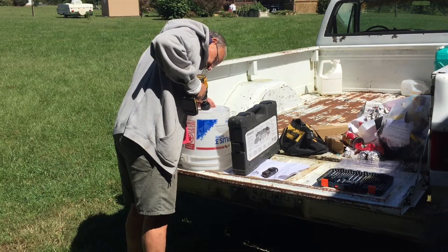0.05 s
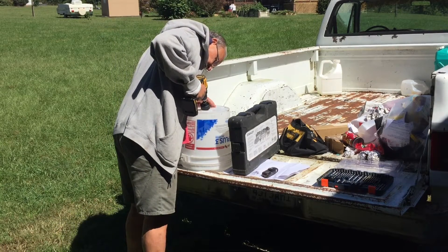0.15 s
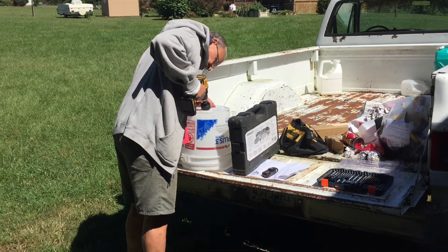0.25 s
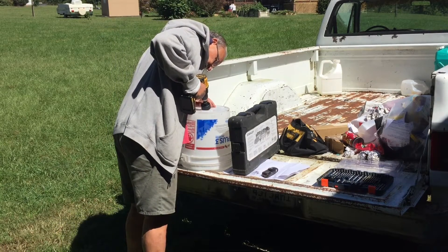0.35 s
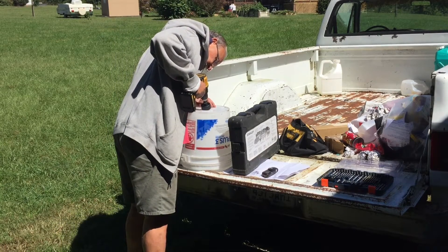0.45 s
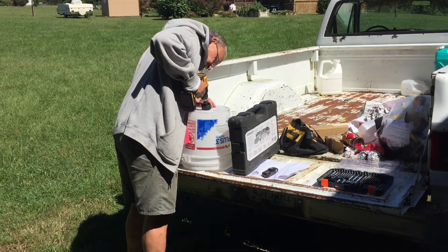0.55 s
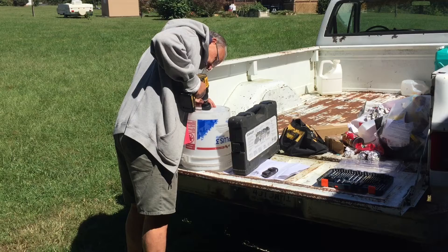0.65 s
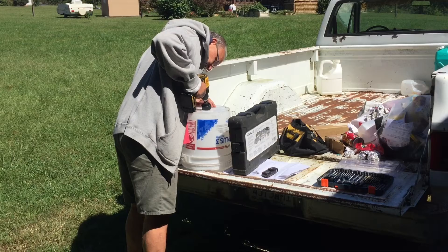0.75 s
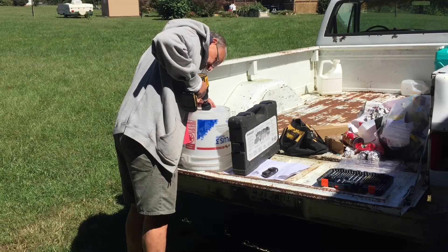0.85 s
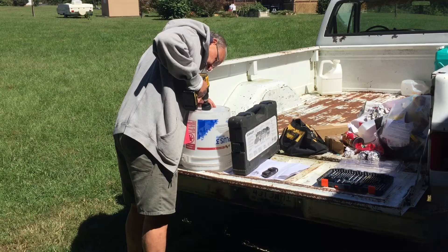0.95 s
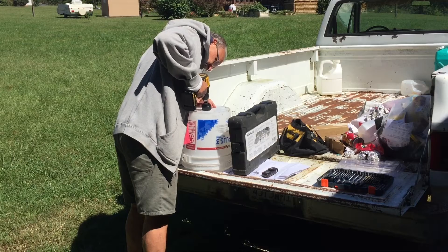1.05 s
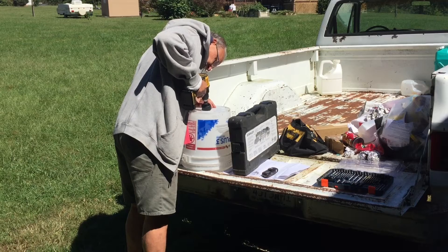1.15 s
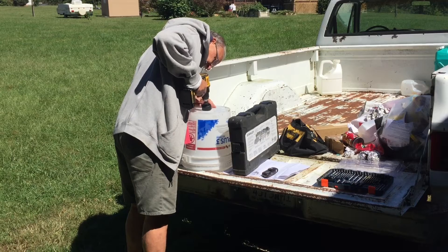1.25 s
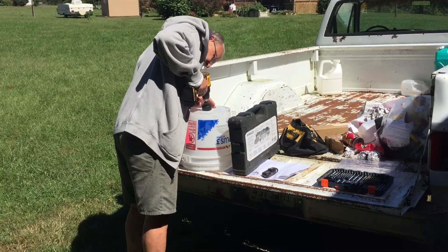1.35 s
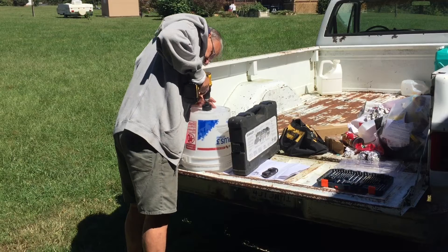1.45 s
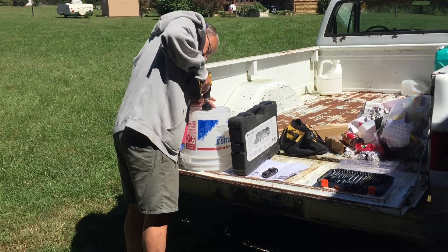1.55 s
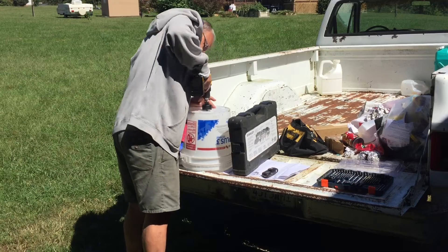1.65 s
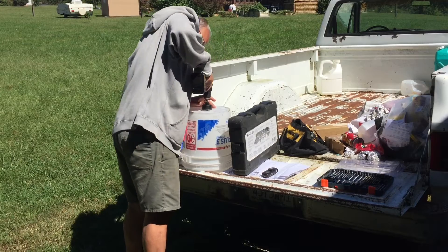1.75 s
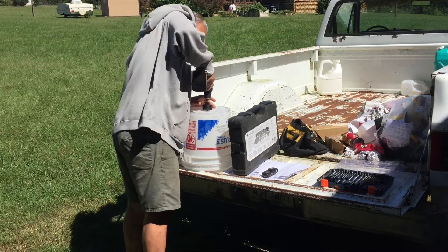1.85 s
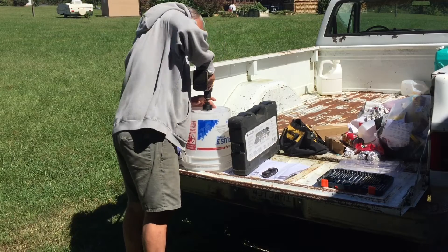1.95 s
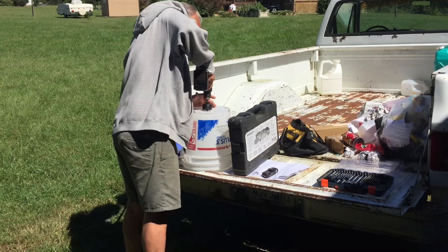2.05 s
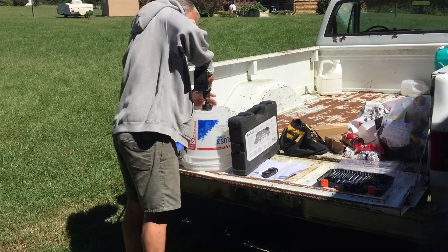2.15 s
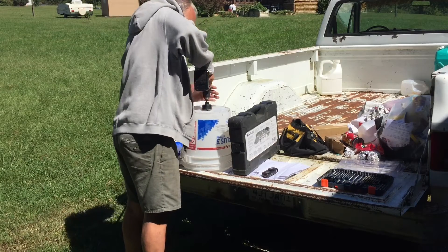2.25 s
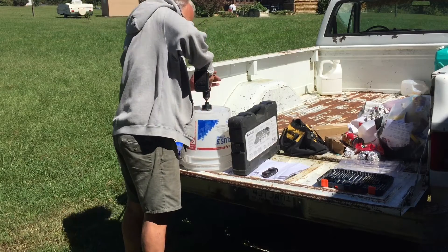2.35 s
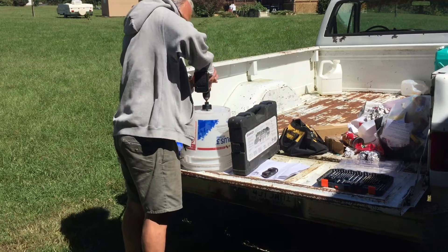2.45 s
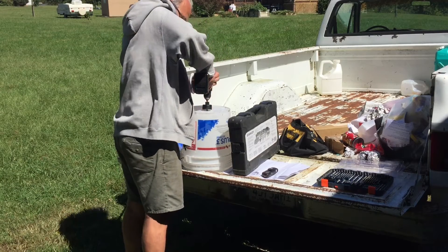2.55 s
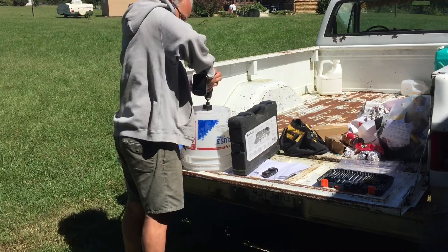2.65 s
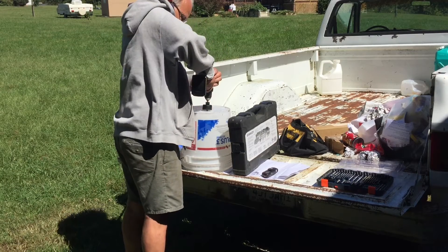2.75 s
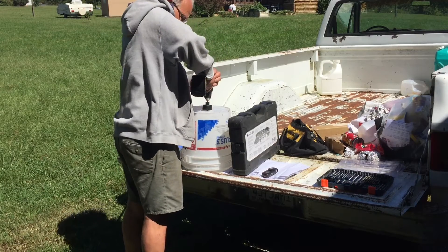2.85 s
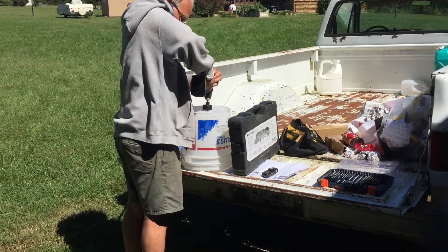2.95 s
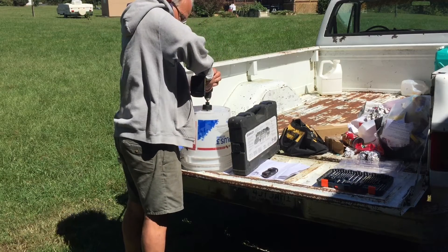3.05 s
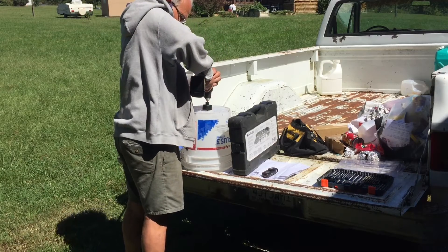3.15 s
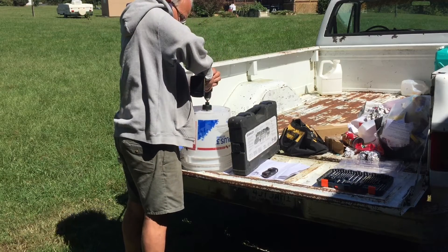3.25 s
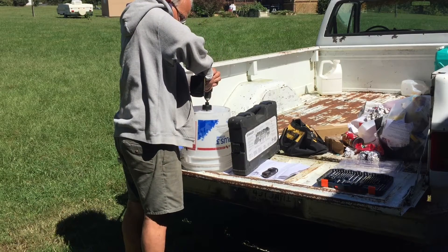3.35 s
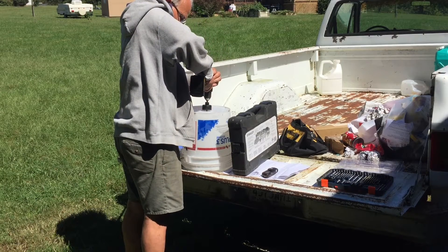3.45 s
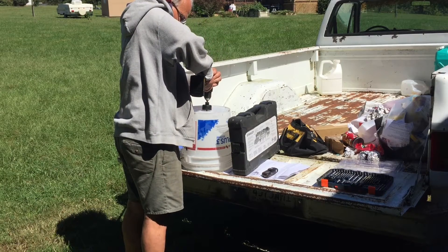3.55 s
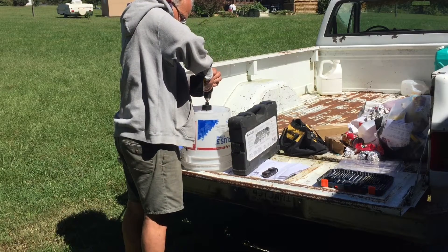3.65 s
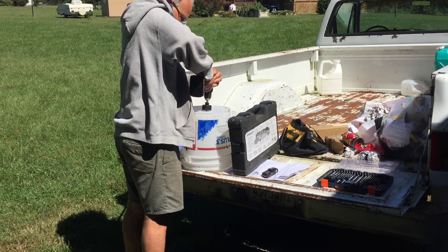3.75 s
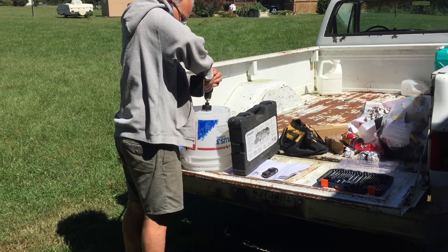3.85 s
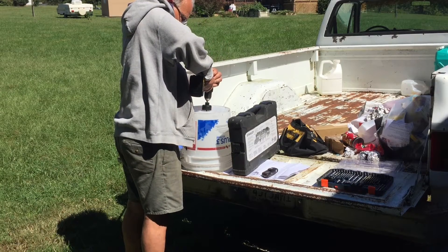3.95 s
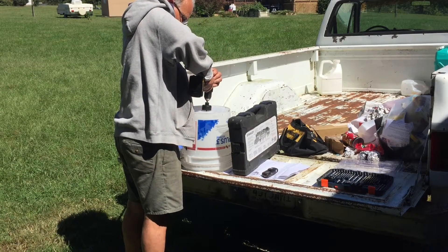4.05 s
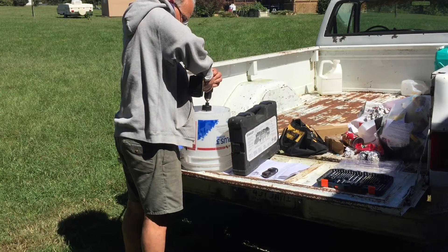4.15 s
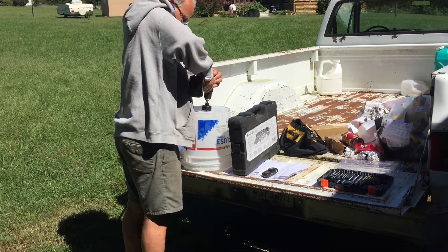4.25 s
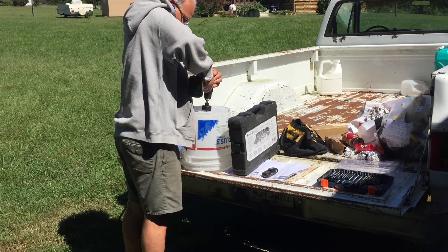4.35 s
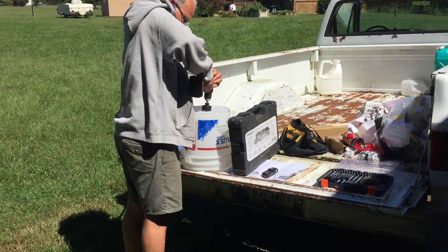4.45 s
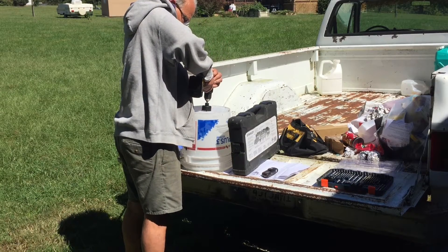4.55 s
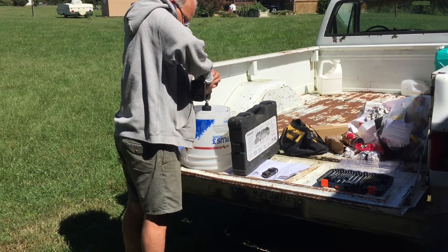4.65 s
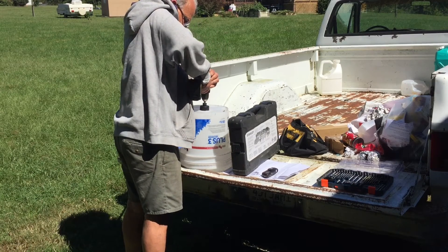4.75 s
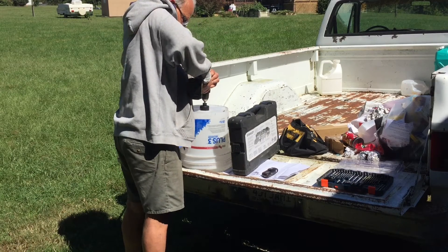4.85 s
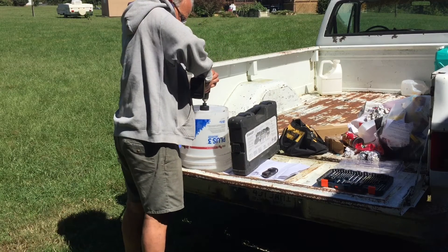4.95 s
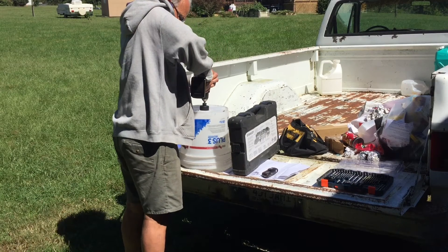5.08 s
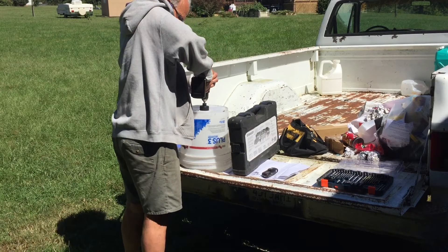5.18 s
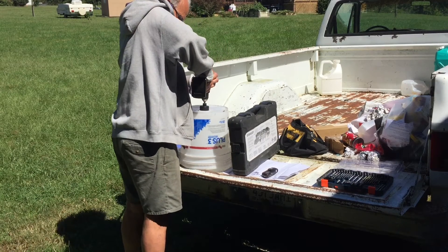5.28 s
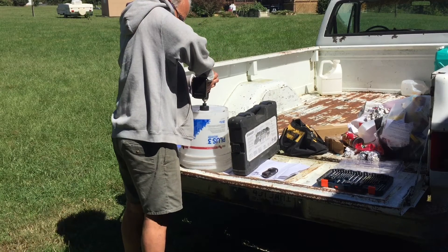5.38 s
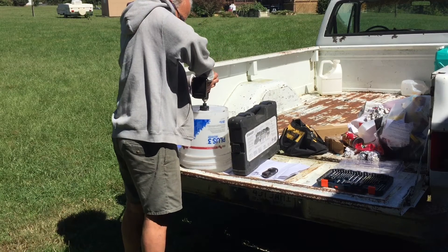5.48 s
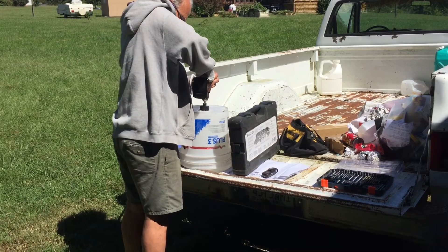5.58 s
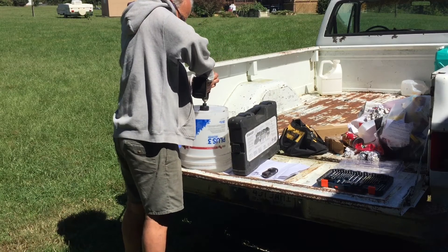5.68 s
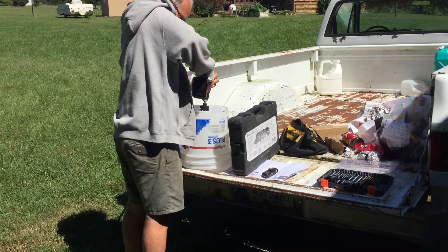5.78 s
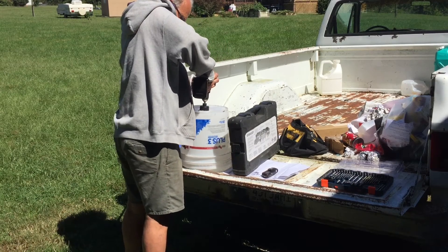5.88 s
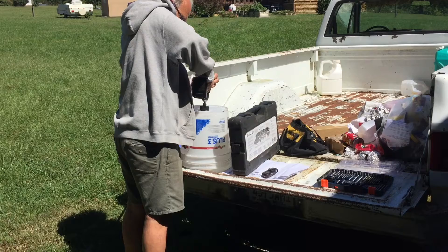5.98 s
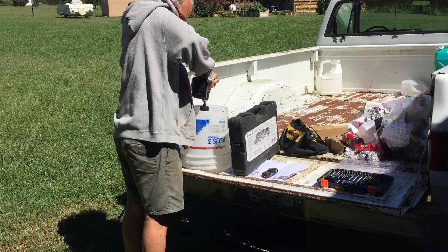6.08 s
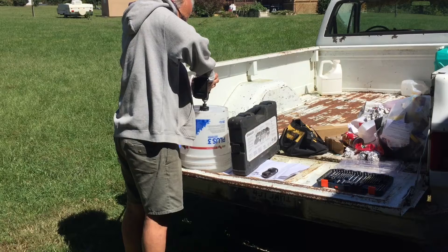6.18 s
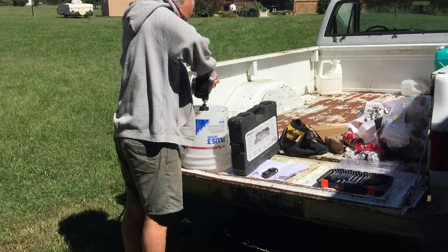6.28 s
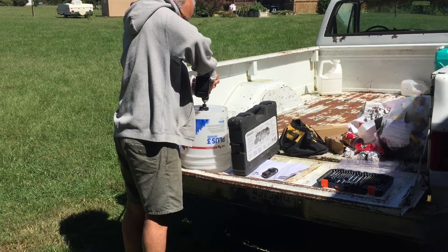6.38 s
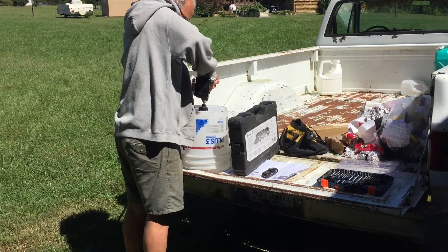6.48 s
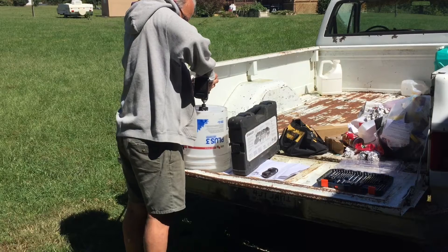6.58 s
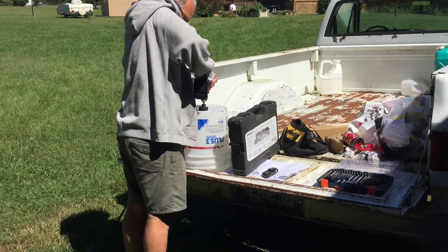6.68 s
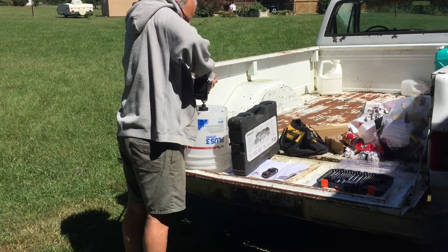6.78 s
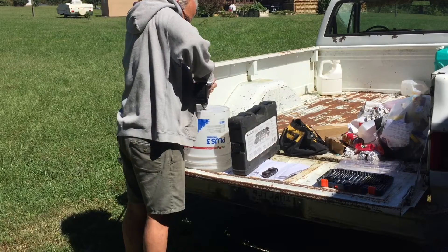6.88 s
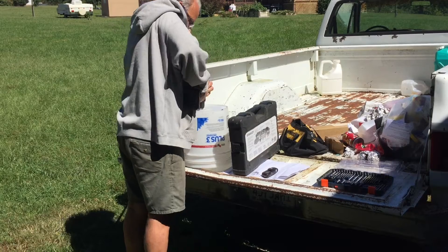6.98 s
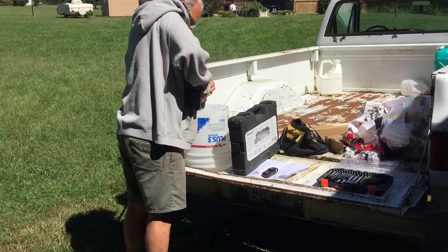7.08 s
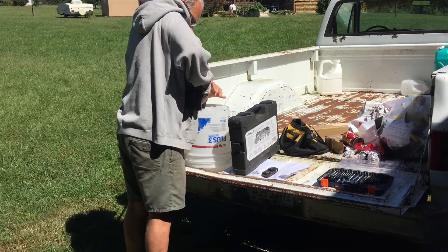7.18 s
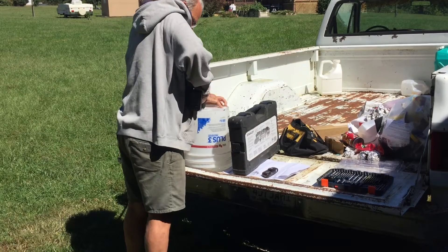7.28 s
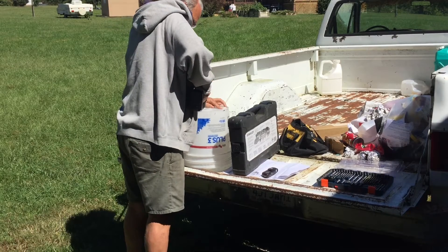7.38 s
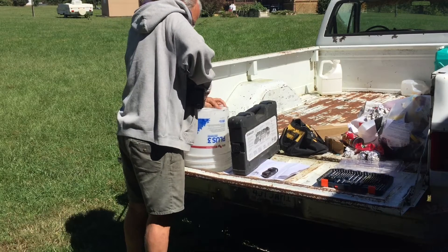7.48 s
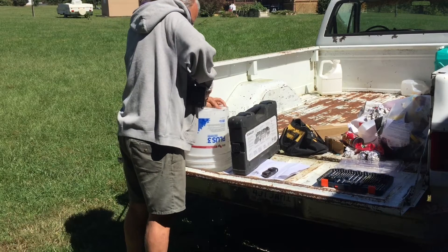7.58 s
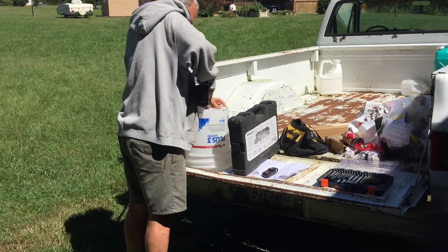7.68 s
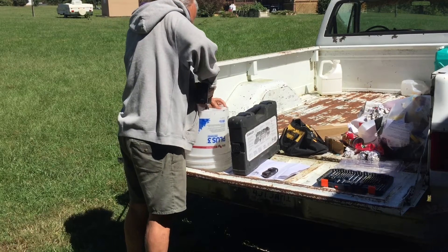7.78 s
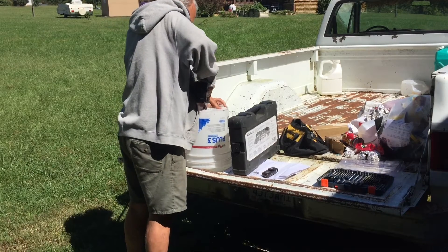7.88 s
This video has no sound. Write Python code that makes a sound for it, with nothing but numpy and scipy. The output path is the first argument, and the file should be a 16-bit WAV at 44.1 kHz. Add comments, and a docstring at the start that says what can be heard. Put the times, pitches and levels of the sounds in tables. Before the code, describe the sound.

Quiet open air, small clicks and knocks, then a whining drill grinds into a plastic bucket, catches with a loud crack and briefly restarts.

```python
"""Hole saw through a plastic bucket

A cordless drill cuts the base of an upturned bucket on a steel tailgate, outdoors, over a quiet breeze and hum.
Stick-slip pulses creak, short pushes knock the modes of bucket and tailgate, and noise bursts click the chuck.
Then gears whirr and whine as shaped grit and gliding sines; random tooth impacts rasp and drum the plastic.
The saw catches, jams with a crack of ringing noise and starts again."""
import sys
import numpy as np
from scipy import signal
from scipy.fft import rfft, irfft
from scipy.io import wavfile
from scipy.ndimage import uniform_filter1d

SR = 44100
rng = np.random.default_rng(int(sys.argv[2]) if len(sys.argv) > 2 else 0)


def log_audio(samples):
    """Write samples as a 16-bit WAV file to the path given in sys.argv[1]."""
    # one column per channel
    frames = np.atleast_2d(samples).T
    # limit to full scale, then quantise
    limited = np.clip(frames, -1, 1)
    pcm = np.round(limited * 32767).astype(np.int16)
    wavfile.write(sys.argv[1], SR, pcm)


def voltage_ratio(decibels):
    """Convert decibels (scalar or array-like) to amplitude ratios, 20 dB per decade."""
    exponent = np.asarray(decibels, float) / 20
    return 10 ** exponent


N = 349272
T = np.arange(N) / SR

# colour of the outdoor air: pitch_hz, level_db (per Hz, relative)
AIR_COLOUR = [(15, -68), (25, -39.5), (43, -6.5), (70, -12.5), (102, 1), (130, -16), (168, -11.5),
              (348, -24.5), (1100, -27.5), (1680, -25), (2080, -24), (6900, -35), (8970, -64),
              (15200, -120)]
# creaks of the rim on the steel:
# start_s, length_s, slip_rate_hz, level_db (rms), roughness (0-1), loudest_hz, spread_octaves (to -6 dB)
RIM_CREAKS = [(0.158, .12, 1500, -60, 0.9, 830, 1.1), (0.815, 0.085, 280, -60, 0.03, 500, .6),
              (0.91, 0.05, 280, -65, 0.05, 500, .5), (1.169, .12, 261, -58, 0.03, 254, .46),
              (1.598, 0.055, 270, -60.5, 0.03, 1380, 1.07), (1.79, 0.1, 285, -65, 0.08, 480, .7),
              (7.462, 0.09, 290, -30.5, .035, 800, .6)]
# modes of the bucket and, under 230 Hz, of the tailgate it stands on:
# pitch_hz, level_db, ring_s (to -60 dB, undamped)
BUCKET_MODES = [(52, -12, .06), (77, -10, 0.038), (121, -3, 0.09), (149, 1, .27), (198, 5.5, 0.14),
                (244, 5, 0.085), (301, 2, 0.13), (340, -2, 0.12), (375, 6.5, 0.067), (384.3, -9.5, 0.09),
                (466, -8, 0.053), (510, -4, .03), (570, -1, 0.029), (667.6, 4.5, 0.02), (790, 1.5, 0.03),
                (925, 5, 0.022), (1104, 4.5, 0.025), (1220, 4, 0.022), (1370, 8.5, 0.018), (1552, 3, 0.034),
                (1715, 0.1, 0.036), (1920, -15, 0.09), (2100, -11, 0.04), (2400, -13, 0.016),
                (3010, -21, 0.024), (3600, -32, .015), (4400, -28, .015), (5400, -30.5, .01)]
# the whole tailgate gives under a blow: pitch_hz, level_db, ring_s (undamped)
TAILGATE_SWAY = (67, -7, .12)
# the air inside the bucket thumps at once: pitch_hz, level_db, ring_s
HOLLOW_AIR = (300, 13.5, .022)
# blows on the bucket: start_s, peak_db, contact_ms, crack_db (peak), deep_db (extra ring under 170 Hz)
BUCKET_BLOWS = [(0.433, -43, 2.4, -66, -5), (0.5175, -20, 1.4, -31, 9), (0.945, -48, 2.2, -66, -4),
                (3.275, -42, 1.4, -47, -3), (4.655, -5, 1.7, -19, 4.5), (6.9465, -1.5, 1.0, -3, 1.5),
                (6.953, -16, .7, -5, 0.1), (6.985, -14, 1.8, -22, 0), (6.995, -12, 1.8, -20, -3),
                (7.009, -3.5, 1.3, -13, -1.5), (7.026, -5.5, 1.6, -16, 1.5), (7.051, -9, 1.8, -22, 2),
                (7.07, -17, 1.2, -22, -5), (7.087, -19, .9, -24, -8), (7.498, -25, 1.2, -34, -8),
                (7.562, -28, 2, -42, -4)]
# chuck clicks: start_s, peak_db, rattle_s (to fall 23 dB), tick_share
CHUCK_CLICKS = [(1.996, -29, 0.1, 0.5), (2.0207, -18, 0.047, 1.2), (2.098, -34, 0.05, 0.5),
                (2.248, -43, 0.07, 0.25), (3.181, -42, 0.039, 0.73)]
# the running drill: time_s, whirr_db, drum_db (over the whirr), rumble_db (over the whirr)
DRILL_EFFORT = [(3.2, -63.5, 4, -1), (3.4, -58.5, 3, -5), (3.46, -49.5, -1, -6), (3.66, -45.5, -3, -4),
                (4.4, -42, -1, -4), (4.6, -34, -14, -7), (4.76, -33.5, -3, -9), (4.92, -36.5, 0, 1),
                (5.08, -45.5, 4, 5), (5.42, -45, -4, -2.5), (5.52, -33.5, -4, -3), (5.66, -33, 4, -13),
                (6.3, -32.5, 3, -16), (6.4, -32.5, -1, -5), (6.93, -31.5, -2, -8), (7.12, -39.5, 1, 1),
                (7.29, -43.5, 6, 14), (7.32, -54, 14, 18), (7.385, -58, 16, 19), (7.41, -67, 24, 27),
                (7.47, -68, 26, 28), (7.5, -47, 9, 7), (7.55, -41.5, 7, 5), (7.72, -36.5, -9, -12),
                (7.84, -40, -5, 1), (7.92, -50, -7, 6)]
# the tool shudders: peak_s, rise_s, fall_s (per 20 dB), rasp_db, drum_db, rumble_db
TOOL_SHUDDERS = [(3.184, .015, .04, -51, -55, -53), (3.28, .03, .15, -55, -58, -64),
                 (3.62, .04, .05, -44, -43, -50), (7.02, .04, .085, -19, -17, -17),
                 (7.28, .03, .2, -44, -45, -40), (7.495, .03, .15, -42, -31, -42),
                 (7.8, .02, .14, -44, -44, -28)]
# colour of the gear whirr: pitch_hz, level_db (per Hz, relative)
GEAR_COLOUR = [(1180, -11), (2000, 1), (2400, -1.5), (2740, -5), (2870, -6), (3110, -4), (3220, -2.5),
               (3360, -3), (4120, -3), (4600, -7), (4800, -19), (5050, -10), (5440, -7), (6440, -11.5),
               (6750, -11.5), (7000, -33), (9100, -46), (15400, -120)]
# gear whines: pilot drilling, sawing, the motor braking, a low drone as it starts again;
# each a list of time_s, pitch_hz, level_db (rms, before flutter)
GEAR_WHINES = [
    [(3.2, 670, -71), (3.3, 680, -66), (3.5, 690, -64), (3.57, 760, -56), (3.62, 790, -49),
     (3.75, 828, -51), (4.1, 835, -49), (4.4, 808, -48), (4.64, 770, -50)],
    [(5.55, 3080, -44), (5.59, 3140, -41), (5.64, 3195, -46), (5.9, 3215, -45), (6.1, 3200, -44),
     (6.2, 3160, -46), (6.245, 3155, -37), (6.36, 3120, -41), (6.38, 3000, -46), (6.55, 3040, -47),
     (6.62, 3085, -42), (6.69, 3170, -37), (6.72, 3190, -45), (6.785, 3110, -38), (6.89, 3145, -39),
     (6.93, 3150, -49)],
    [(7.215, 6800, -63), (7.23, 6720, -48.5), (7.25, 6340, -60), (7.27, 4900, -55), (7.283, 4500, -44),
     (7.296, 4120, -69)],
    [(7.46, 300, -55), (7.472, 300, -31), (7.505, 300, -34), (7.53, 305, -44), (7.62, 310, -43),
     (7.7, 305, -50), (7.78, 310, -44), (7.86, 300, -55)],
]

# teeth reach the plastic, groove is deep, disc breaks out, the hand takes the loose bucket again
SAW_BITES_S, DEEP_S, THROUGH_S, LOOSE_UNTIL_S = 4.6, 6.2, 6.94, 7.62


def level(x, db):
    """Scale to an rms level."""
    return x * voltage_ratio(db) / np.sqrt(np.mean(x ** 2))


def colour(x, points):
    """Shape a spectrum by (Hz, dB) points."""
    hz, db = np.transpose(points)
    log_hz = np.log(np.arange(len(x) // 2 + 1) * SR / len(x) + 1)
    return irfft(rfft(x) * voltage_ratio(np.interp(log_hz, np.log(hz), db, left=-40)), len(x))


def walk(rate):
    """Random levels held 1 / rate s and slewed; spread near 1."""
    hold = int(SR / rate)
    steps = np.repeat(rng.standard_normal(N // hold + 1), hold)
    return 1.3 * uniform_filter1d(uniform_filter1d(steps, hold), hold)[:N]


def ring(x, modes, damping=1., wander_db=0, drift=0):
    """Force in, sum of decaying modes out; neighbours swing in opposite senses."""
    wander_per_s = 11
    out = np.zeros(len(x))
    for k, (hz, db, t60) in enumerate(modes):
        pole = np.exp(2j * np.pi * hz / SR - np.log(1000) * damping / (t60 * SR))
        turn = 1
        if drift:  # share of the pitch by which the mode drifts
            turn = np.exp(2j * np.pi * hz * drift * np.cumsum(walk(wander_per_s)) / SR)
        swell_db = wander_db * walk(wander_per_s) if wander_db else 0
        mode = (turn * signal.lfilter([1], [1, -pole], x / turn)).imag
        out = out + (-1) ** k * voltage_ratio(db + swell_db) * mode
    return out


def modes_between(low_hz, high_hz):
    """The bucket and tailgate modes inside a band."""
    return [m for m in BUCKET_MODES if low_hz < m[0] < high_hz]


def glide(x, width, hz):
    """One resonance whose centre may move: shift it to zero, smooth, shift back."""
    turn = np.exp(2j * np.pi * np.cumsum(hz + 0 * T) / SR)
    smooth = signal.lfilter([1], [1, -np.exp(-np.pi * width / SR)], x / turn)
    return level((smooth * turn).imag, 0)


def grit(rate, spread_db):
    """Random tiny impacts of uneven size."""
    chance = rng.random((3, N))
    hits = (chance[0] < rate / SR) * np.sign(chance[1] - .5)
    return hits * voltage_ratio(-spread_db * np.log(chance[2] + 0.00033))


def between(t0, t1, fade=.03):
    """1 from t0 to t1, with soft edges."""
    return np.clip(np.minimum(T - t0, t1 - T) / max(fade, .002), 0, 1)


def add(out, s, x):
    """Mix a sound in at time s."""
    i = int(s * SR)
    out[i:i + len(x)] += x[:N - i]


def outdoors():
    """Smooth distant hiss, a gusty low end and a wavering hum."""
    air = level(colour(rng.standard_normal(N), AIR_COLOUR), -59) * voltage_ratio(0.5 * walk(3))
    hum_hz = 99 * (1 + 0.014 * walk(17))
    hum = np.sin(2 * np.pi * np.cumsum(hum_hz) / SR) * voltage_ratio(3.4 * walk(16))
    return air + level(hum, -80.5)


def creaks():
    """Stick-slip pulses through the spot that rubs and into the bucket; uneven slips smear the harmonics."""
    skew, lead_s = .7, 1 / 50  # a skew under 1 makes the creak peak early
    out = np.zeros(N)
    for s, length, hz, db, rough, top_hz, spread in RIM_CREAKS:
        times = np.cumsum(np.exp(rough * rng.standard_normal(size=256))) / hz
        times = times[times < length]
        force = np.zeros(SR // 3)
        force[(times * SR).astype(int) + SR // 50] = np.sin(np.pi * (times / length) ** skew)
        spot = colour(force, [(top_hz * 2 ** (k * spread), -6 * k * k) for k in range(-3, 4)])
        creak = spot + voltage_ratio(-46) * ring(spot, BUCKET_MODES)
        add(out, s - lead_s, creak * voltage_ratio(db) / np.sqrt(np.sum(creak ** 2) / (length * SR)))
    return out


def blow_modes(deep_db):
    """Each blow lands elsewhere, so every mode's level scatters; the wall rings harder from 450 to 800 Hz."""
    wall_db, scatter_db = 8, 1.5
    modes = []
    for hz, db, ring_s in [TAILGATE_SWAY] + BUCKET_MODES:
        if hz > 60:
            db = db + deep_db * (hz < 170) + wall_db * (450 < hz < 800)
            modes.append((hz, db + scatter_db * rng.standard_normal(), ring_s))
    return modes


def crack_of(snap, t):
    """A noise burst with a weaker tail through the heavily damped upper modes, duller over 2.3 kHz."""
    rise_s, fall_s, tail_s, tail_db, treble_db = .0006, .006, .035, -13, -10
    decay = np.exp(-t / fall_s) + voltage_ratio(tail_db) * np.exp(-t / tail_s)
    modes = [(hz, db + treble_db * (hz > 2300), ring_s) for hz, db, ring_s in BUCKET_MODES if hz > 550]
    return ring(snap * (1 - np.exp(-t / rise_s)) * decay, modes, damping=4.2)


def blows():
    """A short push and a dying rattle ring the modes (softer contact is longer, duller); a dry crack rides on top."""
    rattle_s = .028
    out, t = np.zeros(N), T[:SR // 3]
    for s, db, contact_ms, crack_db, deep_db in BUCKET_BLOWS:
        push = np.hanning(int(contact_ms * SR / 1000) + 3)
        shake, snap = rng.standard_normal((2, len(t)))
        force = 0.018 * shake * np.exp(-t / rattle_s)
        force[0] = 1
        force = signal.fftconvolve(force, push)[:len(t)]
        knock = ring(force, [HOLLOW_AIR]) + ring(force, blow_modes(deep_db), damping=1.2)
        crack = crack_of(snap, t)
        knock = knock * voltage_ratio(db) / np.abs(knock).max()
        add(out, s, knock + crack * voltage_ratio(crack_db) / np.abs(crack).max())
    return out


def shifting():
    """A hand shifts on the bucket: faint uneven rubbing stirs the base."""
    rub = grit(600, 2.5) * voltage_ratio(4.0 * walk(9))
    return between(.75, 2.25, fade=.1) * level(ring(rub, modes_between(230, 320)), -68)


def clicks():
    """The chuck gives a hard, bright tick with a duller rattle of small parts behind it."""
    chuck_hz, lead_s = 2280, .01
    tick_colour = [(500, -30), (chuck_hz / 3.6, -6), (chuck_hz, 0), (chuck_hz * 1.6, -7), (7000, -11), (9000, -50)]
    rattle_colour = [(350, -30), (chuck_hz / 3.3, -7), (chuck_hz, 0), (chuck_hz * 1.77, -11), (7300, -17)]
    out, t = np.zeros(N), T[:SR // 4] - lead_s
    for s, db, rattle_s, tick_share in CHUCK_CLICKS:
        sharp, loose = rng.standard_normal((2, len(t))) * (t > 0)
        sharp[np.argmax(t > 0)] = 4.0
        tick = colour(tick_share * sharp * np.exp(-t / 0.0016), tick_colour)
        rattle = colour(0.42 * loose * np.exp(-t / max(rattle_s, .002) * 2.63), rattle_colour)
        click = tick + rattle
        add(out, s - lead_s, click * voltage_ratio(db) / np.abs(click).max())
    return out


def effort():
    """Gains of whirr, rasp, drumming and rumble: the running drill, and with its shudders added."""
    s, whirr, drum, rumble = np.transpose(DRILL_EFFORT)
    whirr, drum, rumble = (np.interp(T, s, db) for db in (whirr, whirr + drum, whirr + rumble))
    # the rasp changes less than the whirr, grows uneven deep in the groove and drops once the saw is through
    rasp = -33.5 + .77 * (whirr + 33) - 3 * (T > THROUGH_S)
    rasp = rasp + 1.5 * (1 + walk(22)) * between(DEEP_S, THROUGH_S)
    steady = voltage_ratio(np.array([whirr, rasp, drum, rumble])) * (T > s[0] - .02)
    power = steady ** 2
    for peak, rise, fall, *db in TOOL_SHUDDERS:
        swell = np.clip(1 - (peak - T) / rise, 0, 1) ** 2
        shape = np.where(T < peak, swell, voltage_ratio(-20 * np.maximum(T - peak, 0) / fall))
        gains = voltage_ratio(np.array([db[0] - 5, *db]))  # the whirr shudders 5 dB under the rasp
        power = power + np.outer(gains, shape) ** 2
    return steady, np.sqrt(power)


def gear_whirr(teeth, throb):
    """Dense gear impacts, with the teeth's own, take the colour of the gearbox."""
    impacts = grit(9000, 1.2) * np.sqrt(np.abs(throb)) + .5 * teeth
    return level(colour(impacts, GEAR_COLOUR) * voltage_ratio(.8 * walk(20)), 0)


def wall_rasp(teeth):
    """Teeth ring the wall; its modes swell, fade and drift in pitch as the saw moves round."""
    moving = dict(wander_db=1.7, drift=.03)
    # the pressing saw and hand damp the low modes; after the break-out the bucket stands loose
    grip_db = -2.5 * between(SAW_BITES_S, THROUGH_S) + 8 * between(THROUGH_S, LOOSE_UNTIL_S)
    low = voltage_ratio(grip_db) * ring(teeth, modes_between(450, 800), damping=1.4, **moving)
    return level(low - ring(teeth, modes_between(800, 2300), damping=1.35, **moving), 0)


def base_drum(bites):
    """Bites drum the base, which is too small to radiate bass."""
    base = ring(bites, modes_between(230, 450), damping=1.3)
    return level(signal.sosfilt(signal.butter(3, 205, "high", fs=SR, output="sos"), base), 0)


def steel_rumble(bites):
    """The same bites rumble the damped steel below."""
    return level(ring(bites, modes_between(0, 230), damping=2.5), 0)


def half_cut_disc(bites):
    """The half-cut disc rings higher as the groove deepens."""
    from_hz, to_hz, rise_s = 330, 400, 1.3
    hz = to_hz - (to_hz - from_hz) * np.exp(-np.maximum(T - SAW_BITES_S, 0) / rise_s)
    return voltage_ratio(0.1) * glide(bites, 20, hz) * between(SAW_BITES_S, THROUGH_S)


def saw_cup(teeth):
    """The cup of the hole saw rings narrowly until the groove is deep."""
    return voltage_ratio(-6) * glide(teeth, 55, 1680) * between(SAW_BITES_S, DEEP_S + .03, fade=.2)


def housing(teeth):
    """The drill housing resonates broadly, fading once the saw bites."""
    fade_s = .5
    return voltage_ratio(-4) * glide(teeth, 280, 3450) * np.clip(1 - (T - SAW_BITES_S) / fade_s, 0, 1)


def gear_mesh(teeth):
    """A band of gear noise and its octave."""
    hz, width_hz = 2800, 160
    band = glide(teeth, width_hz, hz) + voltage_ratio(-6.5) * glide(teeth, 2 * width_hz, 2 * hz)
    return voltage_ratio(-11) * band * between(4.95, 5.55, fade=.1)


def deep_groove(teeth):
    """The deep groove rasps lower, as one wide resonance."""
    return voltage_ratio(-4) * glide(teeth, 550, 1200) * between(DEEP_S, THROUGH_S, fade=.1)


def drilling():
    """Teeth bite the plastic at random: the wall rasps, the base drums, the steel rumbles; gears whirr on."""
    steady, (whirr, rasp, drum, rumble) = effort()
    # the teeth and gears pulse once a motor turn while the pilot bit drills
    s, hz, _ = np.transpose(GEAR_WHINES[0])
    whine_per_turn, throb_depth = 3.8, .4
    turns = np.cumsum(np.interp(T, s, hz) / whine_per_turn) / SR
    throb = 1 + throb_depth * between(s[0], s[-1], fade=.2) * np.sin(2 * np.pi * turns)
    teeth = grit(2500, 2.18) * voltage_ratio(0.8 * walk(25)) * throb
    bites = grit(1200, 2.0) * voltage_ratio(1.3 * walk(30))
    out = whirr * (gear_whirr(teeth, throb) + housing(teeth) + gear_mesh(teeth))
    out = out + rasp * (wall_rasp(teeth) + deep_groove(teeth))
    out = out + drum * base_drum(bites) + rumble * steel_rumble(bites)
    out = out + steady[0] * half_cut_disc(bites) + steady[2] * saw_cup(teeth)
    # the pilot bit runs out of true: the level wobbles once a chuck turn, at a peak at 3.63 s
    motor_per_chuck, wobble_db = 29.5, 1.6
    chuck = (turns - np.interp(3.63, T, turns)) / motor_per_chuck
    return out * voltage_ratio(wobble_db * between(3.5, 4.35, fade=.1) * np.cos(2 * np.pi * chuck))


def whines():
    """Gear-mesh tones that follow the motor speed and flutter under load."""
    out = np.zeros(N)
    for table in GEAR_WHINES:
        s, hz, db = np.transpose(table)
        pitch = np.interp(T, s, hz) * (1 + .002 * walk(30))
        gain = voltage_ratio(np.interp(T, s, db, left=-120, right=-120) + 2.4 * walk(25))
        out = out + np.sqrt(2) * gain * np.sin(2 * np.pi * np.cumsum(pitch) / SR)
    return out


def truck_bed(near):
    """A short slap from the walls of the truck bed: a noise tail that dies in milliseconds."""
    t = T[:SR // 8]
    tail = rng.standard_normal(len(t)) * np.exp(-t / 0.0098) * (t > .003)
    unit_energy = level(tail, 0) / np.sqrt(len(t))
    return voltage_ratio(-19) * signal.fftconvolve(near, unit_energy)[:N]


def scene():
    """All near sources with their slap from the truck bed, over the outdoor air."""
    near = creaks() + blows() + shifting() + clicks() + drilling() + whines()
    return (outdoors() + near + truck_bed(near))[None]


def top_cut(x):
    """Nothing passes above the cut-off."""
    return signal.sosfilt(signal.butter(12, 7720, fs=SR, output="sos"), x)


def record(dry):
    """The phone drops the deep bass, rounds the loudest peaks and cuts the top."""
    bass = signal.butter(2, 110, "high", fs=SR, output="sos")
    top = signal.ellip(10, .2, 80, 6950, fs=SR, output="sos")
    soft = 1.1 * np.tanh(signal.sosfilt(bass, dry) / 1.1)
    return top_cut(signal.sosfilt(top, soft))


dry = scene()
out = record(dry)
log_audio(out)
```